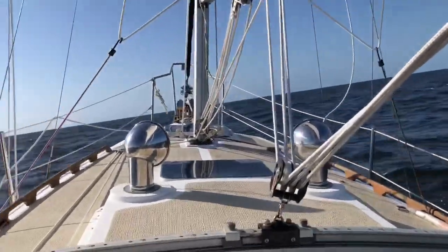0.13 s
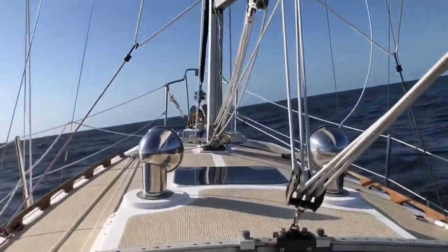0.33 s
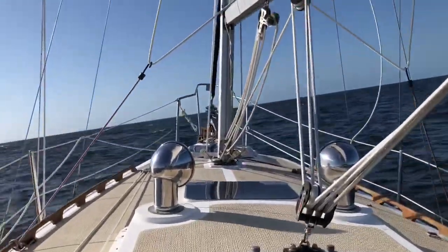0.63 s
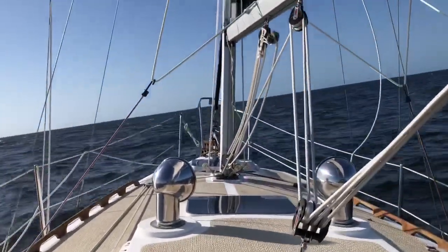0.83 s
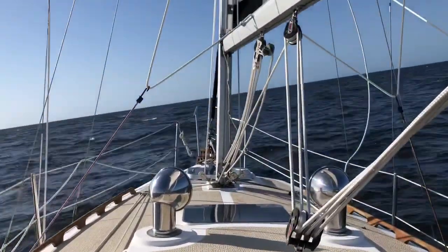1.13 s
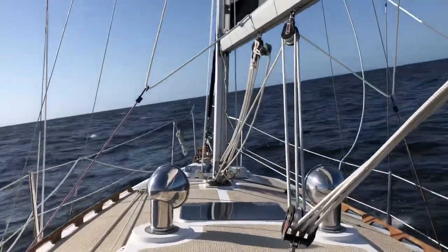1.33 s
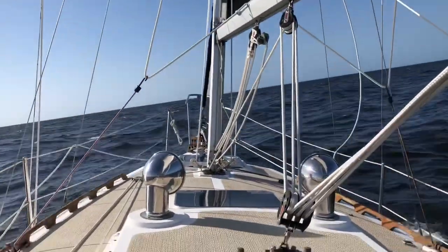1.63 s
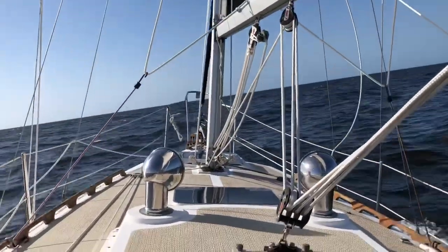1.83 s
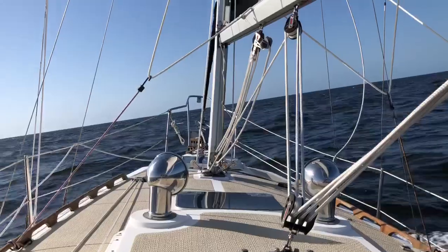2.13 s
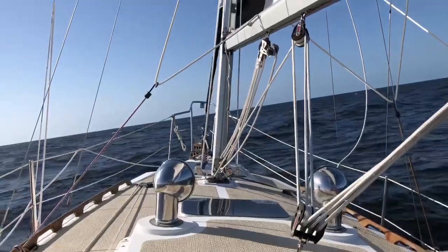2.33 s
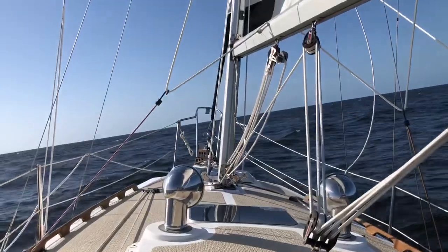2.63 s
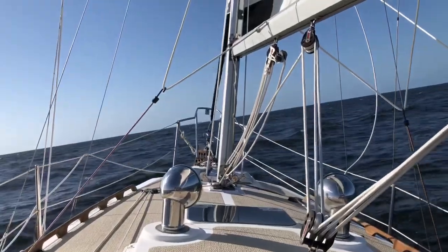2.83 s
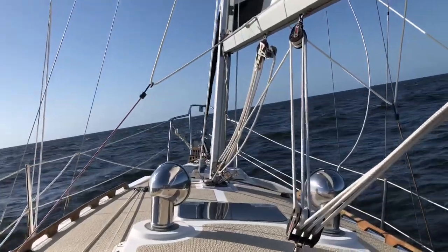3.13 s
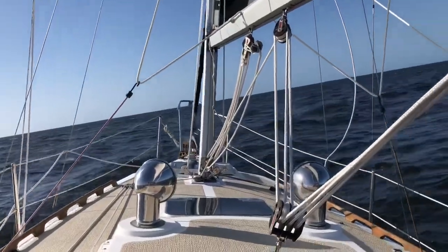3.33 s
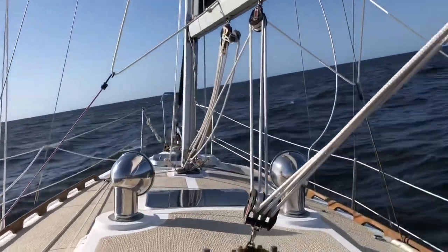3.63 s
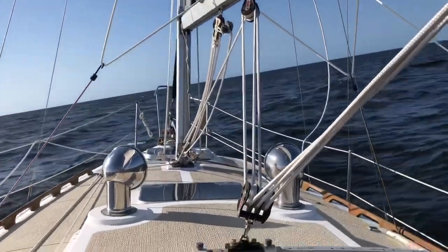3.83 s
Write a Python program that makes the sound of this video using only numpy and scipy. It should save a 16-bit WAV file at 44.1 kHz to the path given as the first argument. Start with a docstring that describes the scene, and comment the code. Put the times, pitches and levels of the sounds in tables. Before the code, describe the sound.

Wind buffets the microphone on a sailboat, gusting hard late over the wash of the sea.

```python
"""Wind rumbles on the microphone of a sailboat; a late gust buffets it hard and drives the limiter.
Each eddy makes the rumble louder and brighter. A wave washes along the hull: noise and pinging
bubbles. A high hiss comes from foam as the wave passes, then from wind during the gust.
Water slaps the hull a few times, spray bursts and drops patter down.
A fitting knocks once on the deck, which rings briefly."""
import sys
import numpy as np
from scipy import signal
from scipy.fft import rfft, irfft
from scipy.io import wavfile
from scipy.ndimage import uniform_filter1d, minimum_filter1d

SR = 44100
rng = np.random.default_rng(int(sys.argv[2]) if len(sys.argv) > 2 else 0)


def int16_out(signal):
    """Quantize to a 16-bit WAV file."""
    q = np.round(np.clip(np.atleast_2d(signal).T, -1, 1) * 32767)
    wavfile.write(sys.argv[1], SR, q.astype(np.int16))


N = 176400
T = np.arange(N) / SR
HZ = np.fft.rfftfreq(N, 1 / SR)

# wind before eddies (time [s], relative level [dB], upper edge of rumble [Hz])
WIND = [(0, -33.5, 257), (.28, -29.5, 240), (.55, -32.5, 259), (.98, -29.5, 275), (1.13, -34, 263),
        (1.35, -30.5, 238), (1.79, -33.5, 243), (1.86, -25, 268), (2.13, -26.5, 270), (2.24, -33, 293),
        (2.41, -30.5, 279), (2.47, -24.5, 266), (2.58, -32.5, 242), (2.72, -25, 260), (2.745, -20.5, 261),
        (2.89, -20.5, 283), (2.97, -24, 265), (3.03, -12.5, 325), (3.14, -14.5, 340), (3.18, -20, 463),
        (3.31, -10.5, 565), (3.39, -13, 620), (3.46, -2, 980), (3.52, -13, 493), (3.57, -5, 844),
        (3.63, -11, 634), (3.755, -21.5, 510), (3.79, -11.5, 610), (3.86, -15, 614), (3.94, -16, 570),
        (4, -11, 610)]
# eddies striking the microphone (time [s], half width [s], edge lift [oct])
BUFFETS = [(2.042, 0.015, 0.5), (2.754, 0.0061, 0.75), (2.827, 0.0044, 0.89), (2.89, 0.021, 0.75),
           (2.994, 0.0031, 0.99), (3.017, 0.0016, 0.9), (3.026, .005, 0.57), (3.063, 0.0052, 1.13),
           (3.104, 0.0014, 1.2), (3.212, 0.0029, 1.13), (3.257, 0.001, 0.35), (3.27, 0.0015, 0.83),
           (3.281, 0.0017, 0.47), (3.29, 0.0032, 0.66), (3.321, 0.0071, 0.75), (3.378, 0.0035, 0.93),
           (3.402, 0.013, 0.52), (3.42, 0.0036, 0.66), (3.434, 0.001, 1), (3.446, 0.008, 0.73),
           (3.473, 0.0015, 0.63), (3.5, 0.006, 0.7), (3.548, 0.011, 0.8), (3.573, 0.012, 0.66),
           (3.588, .005, 0.33), (3.784, 0.0088, 0.87), (3.818, 0.0025, 0.81), (3.88, 0.0066, 0.88),
           (3.899, 0.012, 0.79), (3.97, 0.011, 0.69), (3.98, 0.0018, 1.27)]
# rumble before its edge filters (frequency [Hz], relative density [dB])
RUMBLE_SPECTRUM = [(20, -37), (32, -21), (45, 1.5), (68, 5.5), (110, 2), (190, -1.5), (270, -5), (410, -6),
                   (750, -9), (1300, -11.5), (2200, -15.5), (4000, -19)]
# wash along the hull (time [s], level [dB])
WASH = [(0, -45), (.13, -50.5), (.4, -45), (.55, -47.5), (.7, -43.5), (.82, -41.5), (1.03, -42),
        (1.25, -40.5), (1.52, -41), (1.75, -45), (2.1, -47), (2.7, -48.5), (4, -39.5)]
# wash noise (frequency [Hz], relative density [dB])
WASH_SPECTRUM = [(100, -7.5), (400, 3.5), (600, 0), (950, 3), (1300, -1.5), (2000, -9), (3200, -13),
                 (5500, -20), (10000, -28.5), (16000, -29)]
# high hiss of foam, then of wind in the gust (time [s], level [dB])
HISS = [(0, -59), (.7, -61), (.85, -56.5), (1.12, -56), (1.19, -51), (1.28, -48.5), (1.47, -52.5),
        (1.65, -57), (1.95, -61.5), (2.71, -60.5), (2.76, -54), (2.97, -50.5), (3.08, -52.5), (3.28, -54.5),
        (3.36, -48), (3.55, -51), (3.75, -50.5), (4, -49)]
# hiss noise (frequency [Hz], relative density [dB])
HISS_SPECTRUM = [(500, -6), (2000, 6.5), (3500, -0.5), (5500, 0.9), (7500, -1.5), (10000, -5),
                 (13000, -11.5), (16000, -18)]
# slaps on the hull (time [s], level [dB])
SLAPS = [(0.043, -35.5), (0.172, -37), (1.855, -38.5), (1.996, -39)]
# slap noise (frequency [Hz], relative density [dB])
SLAP_SPECTRUM = [(200, -21), (600, 7), (1300, 3.5), (2200, -13), (4000, -37), (16000, -61)]
# large drops on deck (time [s], pitch [Hz], level [dB])
DRIPS = [(0.136, 10900, -52.5), (.507, 8950, -52), (.542, 13500, -54), (.569, 12500, -51), (.59, 3350, -40),
         (0.606, 8700, -44), (.632, 8900, -49), (1.397, 14300, -56), (1.711, 14500, -54),
         (2.185, 10000, -55), (2.311, 2900, -46)]
# spray bursts (peak time [s], rise [s], fall [s], mist level [dB], drop level [dB])
SPRAYS = [(.298, 0.061, 0.11, -43, -47), (.59, 0.16, 0.056, -54, -50)]
# spray noise (frequency [Hz], relative density [dB])
SPRAY_SPECTRUM = [(300, 3), (900, -1.5), (2500, 3), (4500, -3.5), (8000, -7), (12000, -11), (16000, -11)]
# two contacts of one knock (time [s], level [dB])
KNOCK_CONTACTS = [(1.8425, -32.5), (1.8452, -24)]
# deck modes (frequency [Hz], relative level [dB], T60 [s])
DECK_MODES = [(566, 3, 0.016), (940, 2, .028), (1280, -8, 0.022), (1650, -2, 0.022), (2140, -4.5, 0.023),
              (2700, -11, 0.018)]


def amp(db):
    """Decibels to gain."""
    return 10 ** (np.asarray(db) / 20)


def unit(x):
    """Scale to rms 1."""
    return x / np.sqrt(np.mean(x ** 2) + 1e-20)


def curve(rows, column=1):
    """Table column, linearly interpolated in time."""
    rows = np.array(rows)
    return np.interp(T, rows[:, 0], rows[:, column])


def noise(spectrum):
    """Noise of rms 1 with the given spectrum."""
    hz, db = np.transpose(spectrum)
    gain = amp(np.interp(np.log(HZ + 1), np.log(hz), db))
    return unit(irfft(rfft(rng.standard_normal(N)) * gain, N))


def wander(hz):
    """Random motion of rms 1, rolling off above hz."""
    white = rfft(rng.standard_normal(N))
    return unit(irfft(white * HZ / (HZ + hz / 10) / (1 + (HZ / hz) ** 2), N))


def clicks(per_s, spread_db):
    """Random impulses, mostly small, a few large."""
    hits = rng.random(N) < per_s / SR
    sizes = amp(spread_db * np.minimum(rng.exponential(1, N), 4))
    return hits * sizes * rng.choice([-1, 1], N)


def wind():
    """Turbulence on the microphone: each eddy raises the rumble's level and band edges."""
    offset_db, max_db, buffet_db_per_oct = 5.5, -2.5, 7
    churn_oct, churn_db, edge_order = 0.19, 1.5, 3.88
    lift_oct = sum(octaves * np.exp(-np.minimum(((T - at_s) / half_s) ** 2, 20))
                   for at_s, half_s, octaves in BUFFETS)
    churn = wander(hz=74.5)  # small eddies
    upper_hz = curve(WIND, column=2) * 2 ** (lift_oct + churn_oct * churn)
    lower_hz = 63.4 * (upper_hz / 453) ** 0.77
    level = amp(offset_db + curve(WIND) + buffet_db_per_oct * lift_oct)
    level = level / np.hypot(1, level / amp(max_db))  # hardest wind: brighter rather than louder
    spectrum, rumble = rfft(noise(RUMBLE_SPECTRUM)), np.zeros(N)
    for centre_hz in 16 * 2 ** (np.arange(19) / 2):  # half-octave bands
        band = np.maximum(1 - 2 * abs(np.log2((HZ + 1) / centre_hz)), 0)
        treble_loss = 1 + (centre_hz / upper_hz) ** (2 * edge_order)
        bass_loss = 1 + (lower_hz / centre_hz) ** 4
        rumble += irfft(spectrum * band, N) / np.sqrt(treble_loss * bass_loss)
    return level * amp(churn_db * churn) * rumble


def bubbles():
    """Bubbles of many sizes ring as short rising pings; small ones are higher and die sooner."""
    per_s, decay_cycles = 550, 5.7
    out, pitches_hz = np.zeros(N), np.geomspace(500, 4000, num=24)
    for hz in pitches_hz:
        cycles = hz * T[:2048]
        age = cycles / decay_cycles
        ping = np.sin(2 * np.pi * cycles * (1 + .02 * age)) * np.exp(-age) / np.sqrt(hz)
        out += signal.oaconvolve(clicks(per_s / len(pitches_hz), spread_db=8), ping)[:N]
    return unit(out)


def wash():
    """Water runs along the hull: fluttering noise plus bubbles."""
    flutter_db, bubble_db = .5, -13
    rush = noise(WASH_SPECTRUM) * amp(flutter_db * wander(hz=25))
    return amp(curve(WASH)) * (rush + amp(bubble_db) * bubbles())


def hiss():
    """High hiss of foam as the wave passes, then of wind during the late gust."""
    flutter_db = 1.2
    return amp(curve(HISS)) * noise(HISS_SPECTRUM) * amp(flutter_db * wander(hz=25))


def slaps():
    """Small waves hit the hull with soft, dull splats."""
    rise_s, fall_s = 0.0071, 0.02
    envelope = np.zeros(N)
    for at_s, db in SLAPS:
        attack = np.clip((T - at_s) / rise_s, 0, 1)
        decay = np.exp(-np.maximum(T - at_s - rise_s, 0) / fall_s)
        envelope += amp(db) * attack * decay
    return envelope * noise(SLAP_SPECTRUM)


def drips():
    """Large drops land on deck, each a tick of noise around one pitch."""
    fall_s, width_oct = 0.0033, 0.28
    out, t = np.zeros(N), T[:2048]
    bins_hz = np.fft.rfftfreq(len(t), 1 / SR) + 1
    for at_s, hz, db in DRIPS:
        band = 1 / (1 + (np.log2(bins_hz / hz) / width_oct) ** 2)
        tick = unit(irfft(rfft(rng.standard_normal(len(t))) * band))
        out[round(at_s * SR):][:len(t)] += amp(db) * tick * np.exp(-t / fall_s)
    return out


def spray():
    """Sheets of fine spray swell and fade, single drops ticking in them."""
    drop_fall_s = 0.00084
    out = np.zeros(N)
    for peak_s, rise_s, fall_s, mist_db, drops_db in SPRAYS:
        width_s = np.where(T < peak_s, rise_s, fall_s)
        swell = 1 / (1 + ((T - peak_s) / width_s) ** 2 / 2) ** 2
        impacts = abs(clicks(per_s=450, spread_db=1))
        drop_envelope = signal.lfilter([1], [1, -np.exp(-1 / (drop_fall_s * SR))], impacts)
        mist = amp(mist_db) * noise(SPRAY_SPECTRUM)
        drops = amp(drops_db) * unit(drop_envelope) * noise(SPRAY_SPECTRUM)
        out += swell * (mist + drops)
    return out


def knock():
    """A fitting taps the deck; two quick contacts ring its damped modes."""
    rise_s = 0.00077
    out, t = np.zeros(N), T[:SR // 10]
    modes = sum(amp(db - 60 * t / t60_s) * np.sin(2 * np.pi * hz * t) for hz, db, t60_s in DECK_MODES)
    ring = np.minimum(t / rise_s, 1) * modes
    for at_s, db in KNOCK_CONTACTS:
        out[round(at_s * SR):][:len(t)] += amp(db) * ring
    return out


def scene():
    """Wind, sea and boat at one microphone."""
    return (wind() + wash() + hiss() + slaps() + drips() + spray() + knock())[None]


def record(dry):
    """Fast limiter on the buffets, then end fades and a low-pass."""
    ceiling, limiter_s, fade_s, cutoff_hz = 1, 0.0034, .003, 15750
    span = int(limiter_s * SR)
    gain = minimum_filter1d(ceiling / np.maximum(abs(dry[0]), ceiling), 2 * span)
    gain = uniform_filter1d(uniform_filter1d(gain, span), span)
    fade = np.minimum(np.minimum(T, T[::-1]) / fade_s, 1)
    lowpass = signal.firwin(511, cutoff_hz, window=("kaiser", 9), fs=SR)
    return signal.oaconvolve(dry * gain * fade, lowpass[None], "same")


dry = scene()
out = record(dry)
int16_out(out)
```